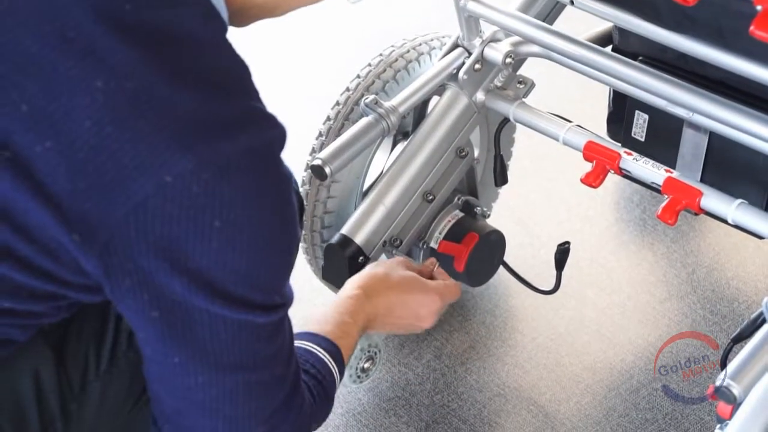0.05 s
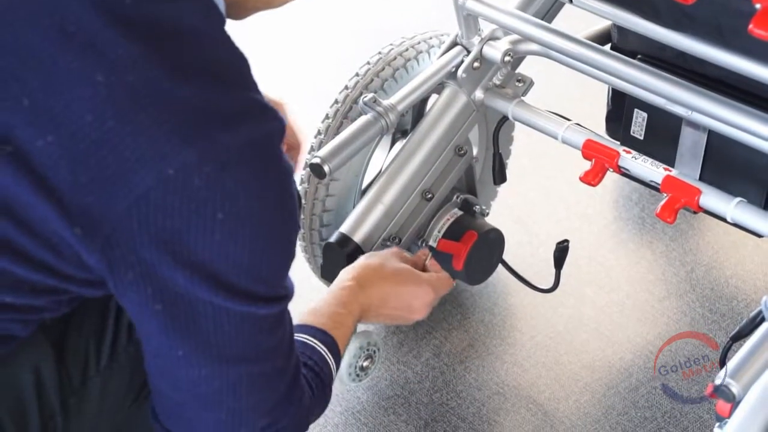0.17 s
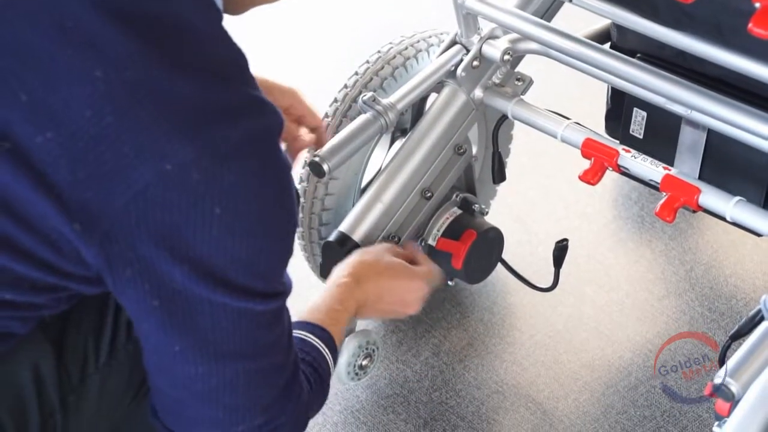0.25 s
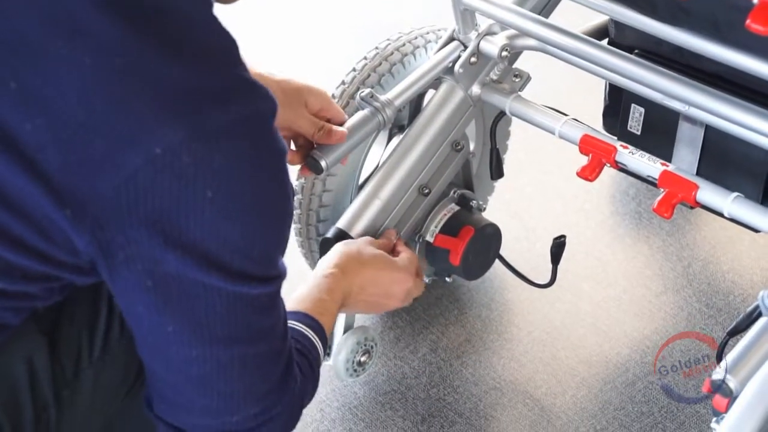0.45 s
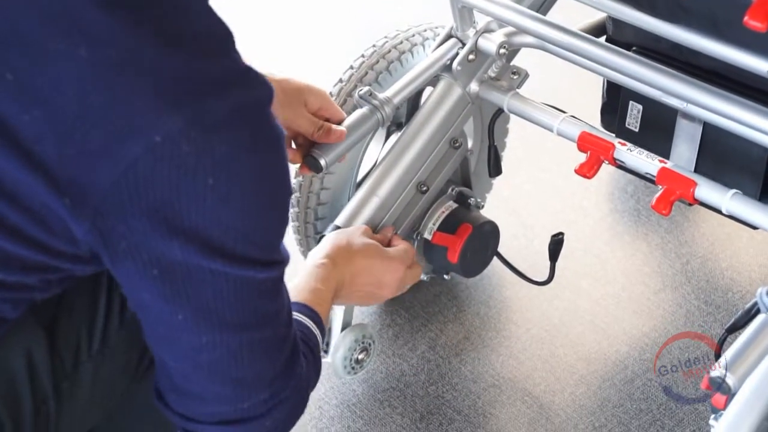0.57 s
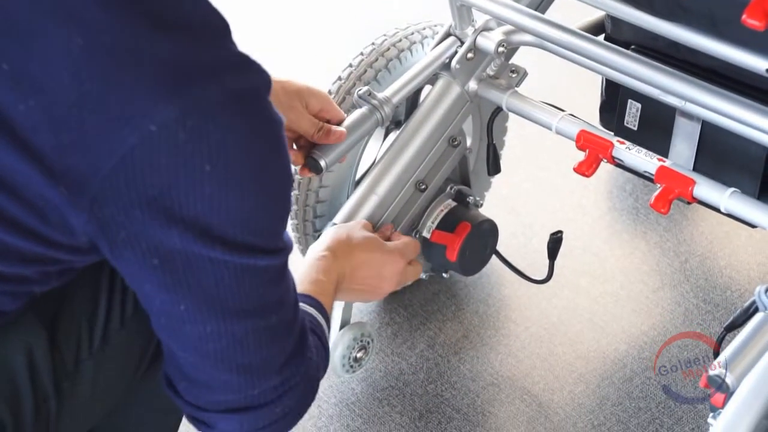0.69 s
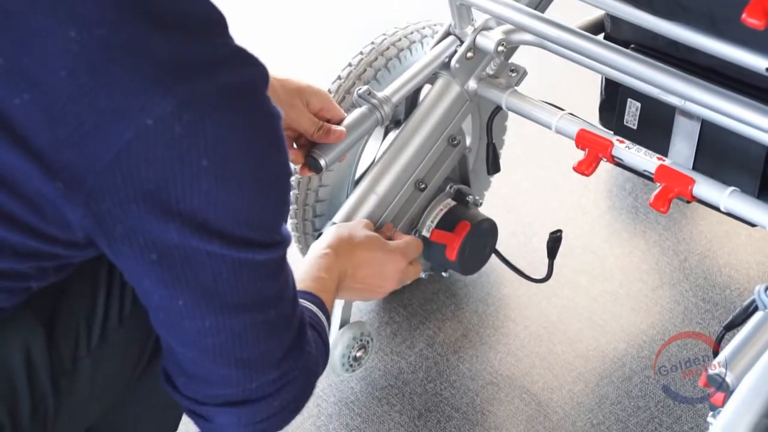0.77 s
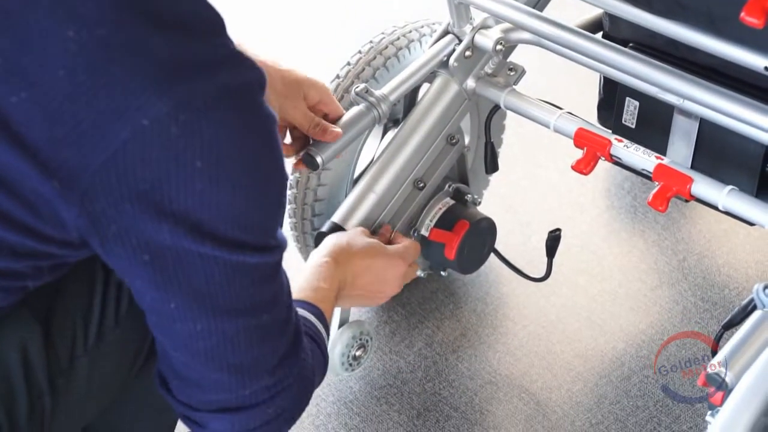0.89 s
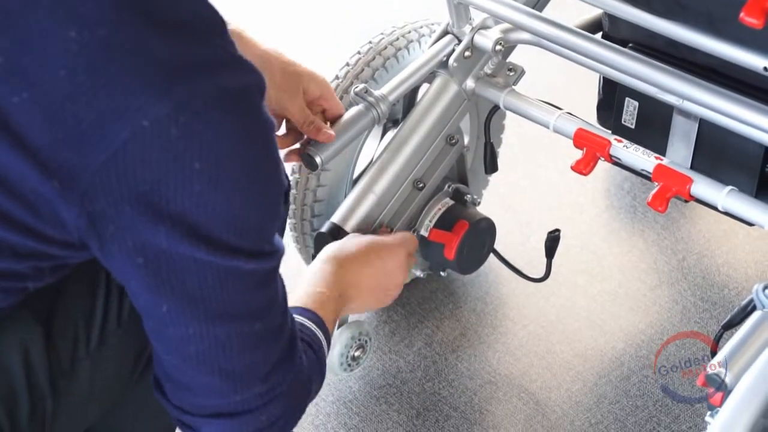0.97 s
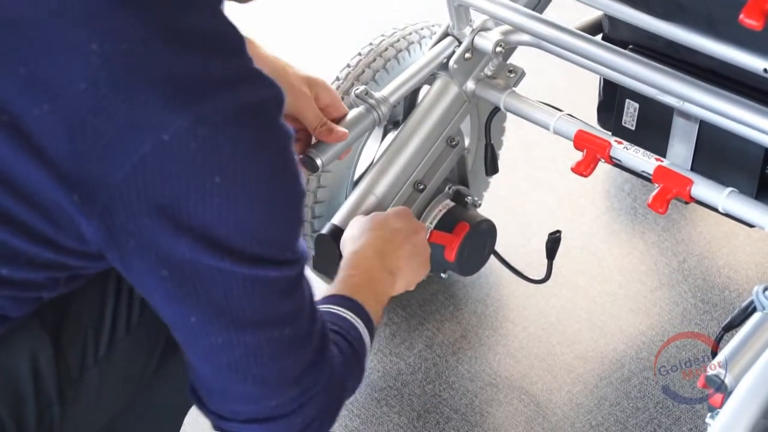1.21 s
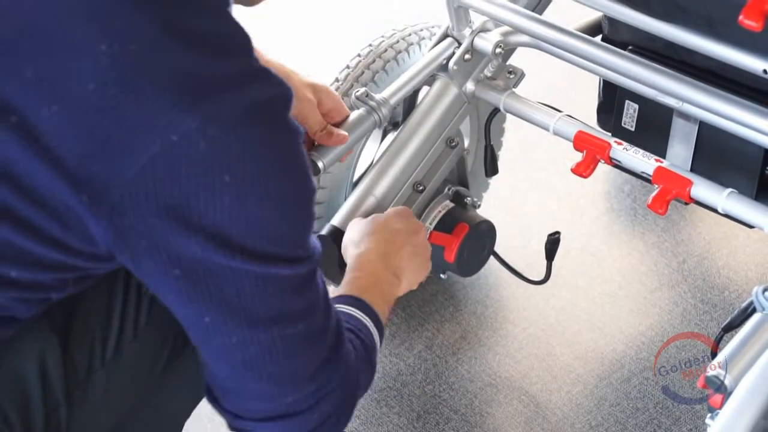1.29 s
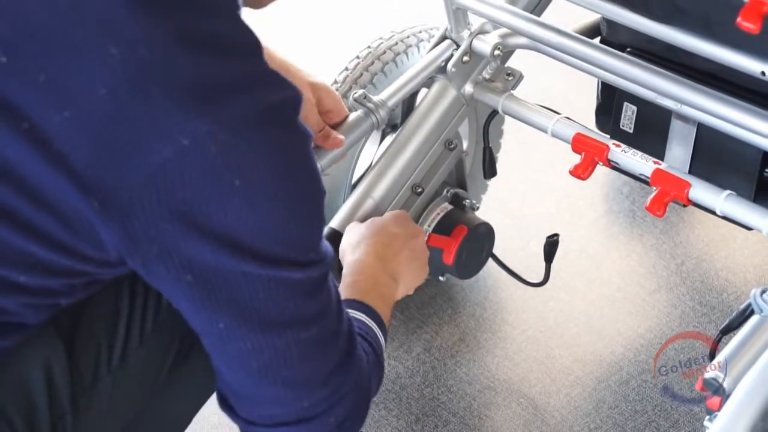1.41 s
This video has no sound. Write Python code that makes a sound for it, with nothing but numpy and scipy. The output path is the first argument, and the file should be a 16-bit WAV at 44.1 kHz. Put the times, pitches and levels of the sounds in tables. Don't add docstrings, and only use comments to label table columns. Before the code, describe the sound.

A metal release lever is thrown on a tubular frame. A barely audible tick at 0.13 seconds runs into a light click at 0.14, then two crisp, bright clacks at 0.24 and 0.27, the second loudest. Thin tubes ring briefly, and a large hard room answers with early echoes and a fading tail. A faint tick settles at 0.65. Low, quiet ventilation hum continues throughout.

```python
import sys
import numpy as np
from scipy import signal
from scipy.io import wavfile

SR = 44100
rng = np.random.default_rng(int(sys.argv[2]) if len(sys.argv) > 2 else 0)


def to_wav(s):
    ch = np.atleast_2d(s).T
    pcm = np.round(np.clip(ch, -1, 1) * 32767)
    wavfile.write(sys.argv[1], SR, pcm.astype(np.int16))


def rack_gain(trim_db):
    fader = np.asarray(trim_db, float)
    return 10 ** (fader / 20)


N = 63945


def rms_one(x):
    return x / np.sqrt(np.mean(x ** 2) + 1e-20)


def at_hz(points, hz, column=1):
    points = np.array(points)
    return np.interp(np.log(hz), np.log(points[:, 0]), points[:, column])


def butter(x, order, hz, kind="low"):
    return signal.sosfilt(signal.butter(order, hz, kind, fs=SR, output="sos"), x)


def ring(clicks, hz, t60):
    radius, angle = rack_gain(-60 / (t60 * SR)), 2 * np.pi * hz / SR
    return signal.lfilter([0, np.sin(angle)], [1, -2 * radius * np.cos(angle), radius ** 2], clicks + 1e-18)


def lever():
    # start_s, level_db, rise_s, chatter_length_s, crack_db
    contacts = [
        (.1263, -53, .0001, .004, 0),
        (.1388, -37.5, .0003, .0035, -4),
        (.2398, -29.5, .0017, .0018, -1),
        (.2723, -24, .0002, .003, -1),
        (.6485, -45.5, .0003, .005, -12),
    ]
    # pitch_hz, width_hz, level_db
    pin_touch = [(2090, 630, -5), (2770, 440, 0), (4540, 230, -3), (5860, 220, -7), (10200, 220, -8),
                 (10800, 190, -12), (12100, 290, -12)]
    pin_click = [(813, 390, -9), (1940, 270, -9), (2660, 250, -7), (3610, 260, 0), (4620, 260, -1),
                 (5740, 250, -4), (6310, 140, -12), (7880, 290, -17), (10200, 240, -10), (12100, 430, -28),
                 (12900, 270, -23)]
    lever_catch = [(2090, 620, -9), (2930, 260, -5), (3860, 160, -8), (5840, 250, -1), (6920, 300, -4),
                   (7940, 230, -4), (8860, 210, -5), (10100, 430, 0), (11200, 400, -5), (11800, 230, -13),
                   (12900, 300, -12), (14600, 200, -23)]
    lever_stop = [(921, 240, -16), (2620, 390, -3), (4620, 360, 0), (5500, 280, -3), (6480, 170, -6),
                  (6960, 320, -8), (7880, 270, -1), (9010, 260, -11), (10100, 230, -7), (11200, 270, -3),
                  (11700, 180, -11), (12600, 270, -14), (14600, 290, -11)]
    settle = [(3890, 270, 0), (4970, 180, -13), (5630, 220, -11), (7830, 280, -15)]
    # pitch_hz, level_db (per Hz)
    cracks = [
        [(530, -42), (900, -3), (3990, -1), (4600, -9), (7150, -24), (10500, -13), (15500, -36)],
        [(410, -40), (700, -7), (3070, -6.5), (3490, -2), (4700, -4), (7310, -8.5), (10400, -12.5),
         (14200, -31), (15500, -66)],
        [(530, -29), (900, -13), (4230, -2), (5700, -1), (7500, -3.5), (9980, -3.5), (13300, -22), (15500, -21)],
        [(410, -46), (700, -18), (1370, -11), (2630, -6), (4030, -4), (4580, -1.5), (8990, -9), (11400, -9),
         (15500, -16)],
        [(1800, -30), (3200, -11), (3950, -5), (5200, -13), (8000, -14.5), (11000, -37), (16000, -60)],
    ]
    room_sends = [-1, -0.7, -2.5, -0.42, -10]
    # pitch_hz, level_db, t60_s
    tubes = [(1146, -43.5, 0.18), (1412, -54, 0.5), (2753, -41, 0.046), (3297, -37, 0.048),
             (4660, -35, 0.037), (5677, -33.5, 0.072), (8100, -36, 0.045), (11330, -45, 0.012)]

    resonances = [pin_touch, pin_click, lever_catch, lever_stop, settle]
    direct, diffuse = sum(contact(*event, peaks, crack, send_db)
                          for event, peaks, crack, send_db in zip(contacts, resonances, cracks, room_sends))
    diffuse = diffuse + sum(rack_gain(db) * ring(diffuse, hz, t60) for hz, db, t60 in tubes)
    return butter([direct, diffuse], 4, 520, "high")


def contact(start, level_db, rise, length, crack_db, peaks, crack, send_db):
    chatter_per_s, chatter_spread_db, ring_share = 6200, 2, 0.55
    burst, span = 600, 4000
    peak_at = int(rise * SR)

    chance, sign, height = rng.random((3, 1 + len(peaks), burst))
    age = np.arange(burst) / SR
    swell = np.where(age < rise, (age / rise) ** 2, np.exp(-np.abs((age - rise) / length) ** 1.5))
    hit = (chance < chatter_per_s / SR) | (np.arange(burst) == peak_at)
    clicks = np.zeros((1 + len(peaks), span))
    clicks[:, :burst] = hit * np.sign(sign - 0.5) * rack_gain(chatter_spread_db * np.log(height + 0.01)) * swell

    body = 0
    for train, (hz, width, db) in zip(clicks[1:], peaks):
        ringing = np.diff(ring(train, hz, 2.2 / (ring_share * width)), prepend=0)
        body = body + rack_gain(db) * np.sqrt(width) * rms_one(ringing)
    direct = rms_one(body) + rack_gain(crack_db) * coloured(clicks[0], crack)
    single_click = 1.0 * (np.arange(span) == peak_at)
    diffuse = rack_gain(send_db) * coloured(single_click, crack)

    out, i = np.zeros((2, N + span)), int(start * SR)
    out[:, i:i + span] = rack_gain(level_db) * np.array([direct, diffuse]) * np.sqrt(0.005 * SR / span)
    return out[:, :N]


def coloured(clicks, colour):
    edges = np.geomspace(480, 16000, 21)
    out = 0
    for low, high in zip(edges, edges[1:]):
        gain = rack_gain(at_hz(colour, np.sqrt(low * high))) * np.sqrt(high - low)
        out = out + gain * rms_one(butter(clicks, 2, [low, high], "band"))
    return rms_one(out)


def room_response():
    # delay_s, left_db, right_db, smear_s
    echoes = [(.0052, -15, -11, .0008), (.0102, -6.5, -12, .002), (.0135, -9, -8.5, .002),
              (.0174, -5, -4.5, .0016)]
    pan_db, left_lag_s = -4.5, 0.00001
    t, out = np.arange(2500) / SR, 0
    for delay, left_db, right_db, smear in echoes:
        shape = (t >= delay) * np.exp(-np.maximum(t - delay, 0) / smear)
        noise = shape * rng.standard_normal((2, len(t))) / np.sqrt(np.sum(shape ** 2))
        out = out + rack_gain([[left_db], [right_db]]) * noise
    out = np.roll(butter(out, 1, 13000), 32, axis=1)
    out[0, :64] += rack_gain(pan_db / 2) * np.sinc(np.arange(64) - 32 - left_lag_s * SR) * np.hanning(64)
    out[1, 32] += rack_gain(-pan_db / 2)
    return out


def room_tail():
    # pitch_hz, t60_s, level_db, left_right_likeness, left_right_db
    room = [(500, 1.97, 5, 0.38, 0), (1040, 1.66, 8, 0.33, -1), (1950, 1.397, 4.5, 0.14, -4),
            (3420, 1, 5.5, 0.12, -4), (5560, 0.77, 3, 0.068, -4.5), (10100, 0.62, 1.5, 0.08, -3.5),
            (15100, 0.5, 3.5, 0.18, -3)]
    tail_db, start_s, rise_s, low_rise_s = -32.5, 0.001, 0.0034, 0.024
    t = np.arange(N) / SR

    def tail(hz):
        build_s = rise_s + low_rise_s * 1000 / hz
        rise = 1 - np.exp(-np.maximum(t - start_s, 0) / build_s)
        decay_db = -60 * t / at_hz(room, hz)
        gain = rise * rack_gain(tail_db + at_hz(room, hz, column=2) + decay_db)
        return gain, at_hz(room, hz, column=3), at_hz(room, hz, column=4)
    return bands(tail)


def bands(shape):
    warm_up = 4000
    out, edges = 0, 18 * 2 ** np.arange(0, 10.1, 1 / 3)
    white = rng.standard_normal((2, 2, N + warm_up))
    for k, (low, high) in enumerate(zip(edges, edges[1:])):
        mid, side = butter(white[k % 2], 2, [low, high], "band")[:, warm_up:]
        gain, alike, pan_db = shape(np.sqrt(low * high))
        alike = np.clip(alike, -1, 1)
        stereo = np.sqrt(1 + alike) * mid + np.sqrt(1 - alike) * side * [[1], [-1]]
        out = out + gain * rack_gain([[pan_db / 2], [-pan_db / 2]]) * stereo
    return out


def background():
    # pitch_hz, level_db (per Hz)
    air_colour = [(14, -25), (30, -11.5), (90, -6), (240, -5.5), (700, -11.5), (1300, -19), (4000, -28),
                  (13500, -32)]
    # pitch_hz, left_right_likeness
    air_alike = [(40, 0.93), (130, .85), (280, 0.33), (700, 0.27), (1650, -0.51), (5000, -0.025),
                 (14000, 0.029)]
    # pitch_hz, left_right_db
    air_pan = [(60, 0.5), (240, 2.4), (950, -3), (3770, -0.75), (15000, -0.77)]
    hum_hz, hum_width_hz = 161.2, 35
    air_db, skirt_db, tone_db = -56, -68.5, -60.5

    def air_shape(hz):
        return rack_gain(at_hz(air_colour, hz)), at_hz(air_alike, hz), at_hz(air_pan, hz)
    air = butter(rms_one(bands(air_shape)), 12, 13640)
    skirt = ring(rng.standard_normal(2 * N), hum_hz, 2.2 / hum_width_hz)[N:]
    tone = np.sin(2 * np.pi * hum_hz * np.arange(N) / SR)
    return rack_gain(air_db) * air + rack_gain(skirt_db) * rms_one(skirt) + rack_gain(tone_db) * rms_one(tone)


def scene():
    direct, diffuse = lever()
    early = signal.fftconvolve(direct[None], room_response(), axes=1)[:, 32:N + 32]
    late = signal.fftconvolve(diffuse[None], room_tail(), axes=1)[:, :N]
    return early + late + background()


def roll_off(x):
    return signal.sosfilt(signal.butter(12, 16300, fs=SR, output="sos"), x)


def record(dry):
    heard = butter(dry, 8, 14700)
    return roll_off(heard)


dry = scene()
out = record(dry)
to_wav(out)
```